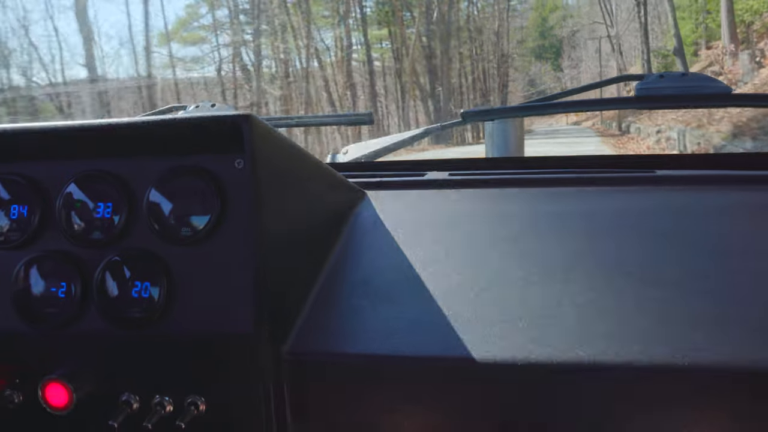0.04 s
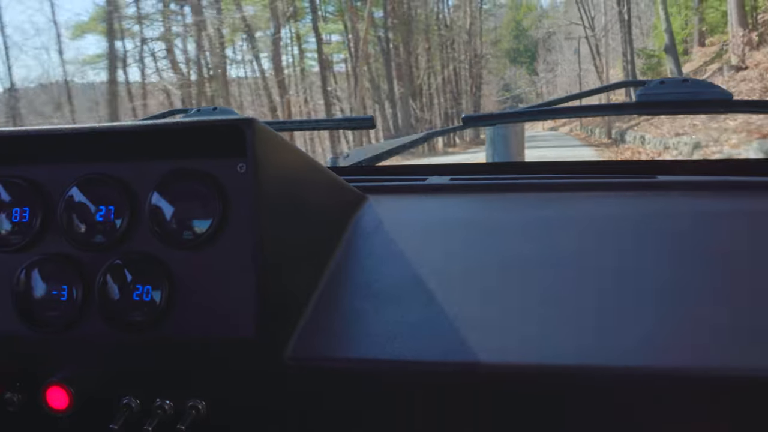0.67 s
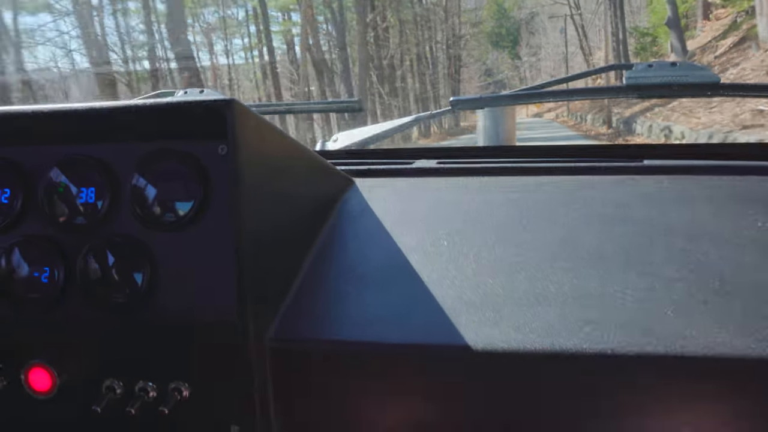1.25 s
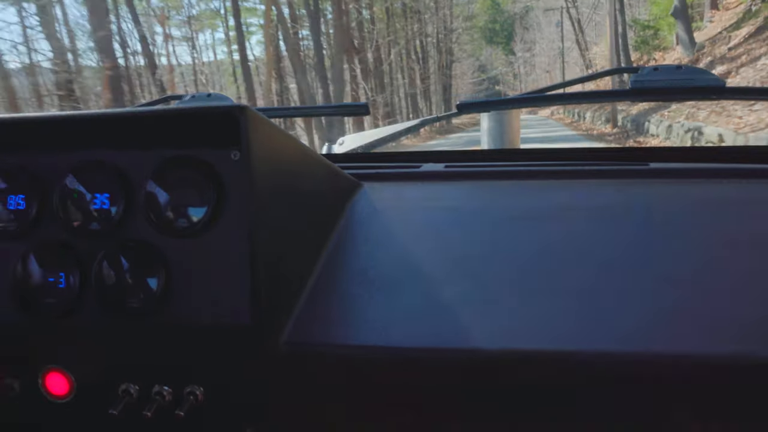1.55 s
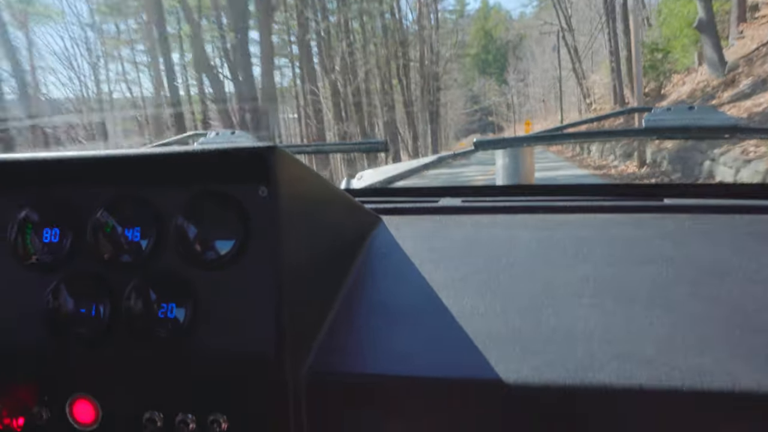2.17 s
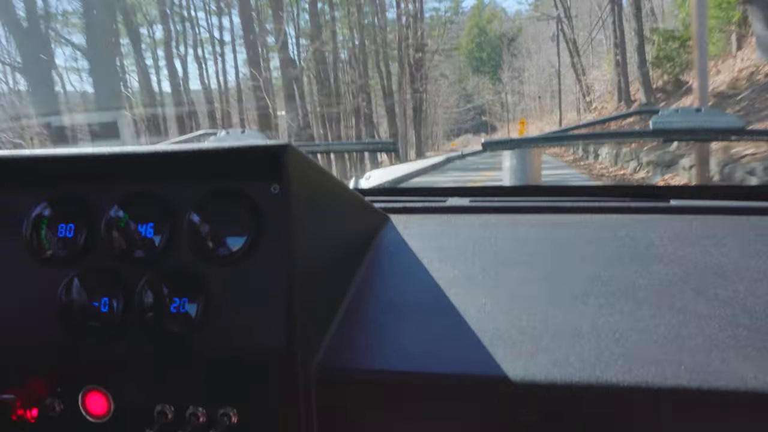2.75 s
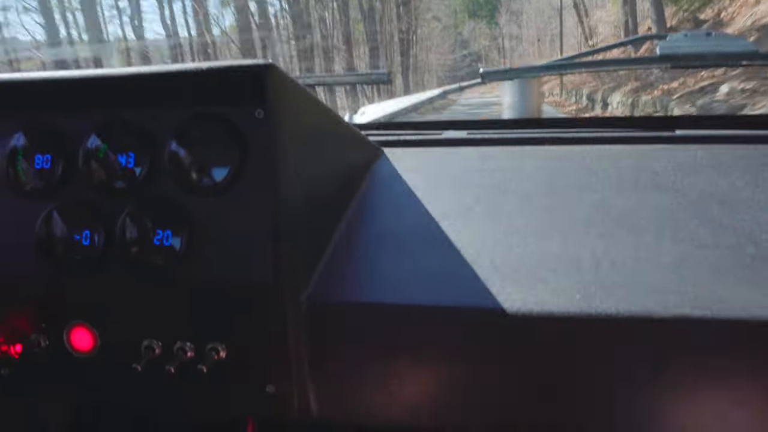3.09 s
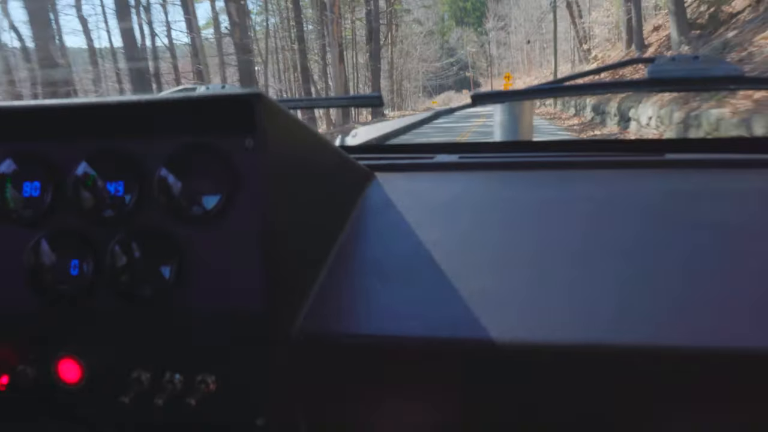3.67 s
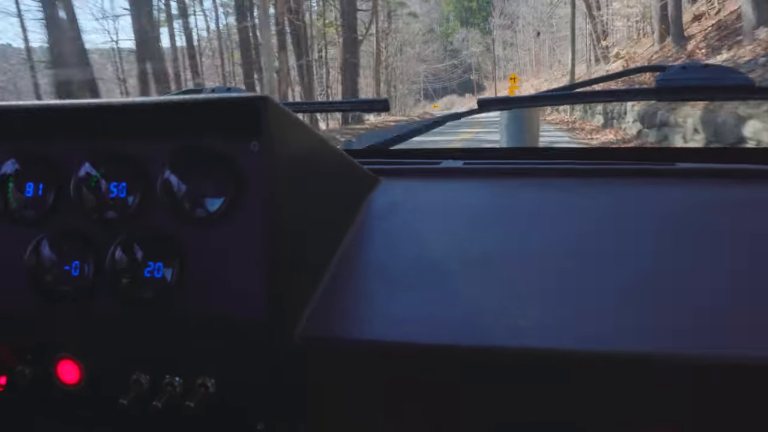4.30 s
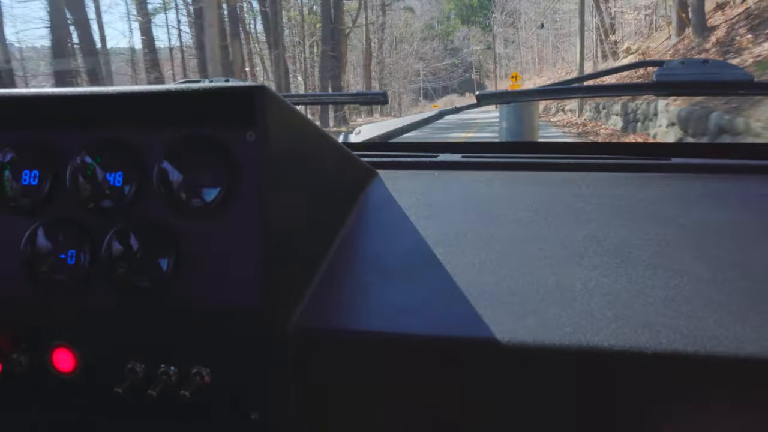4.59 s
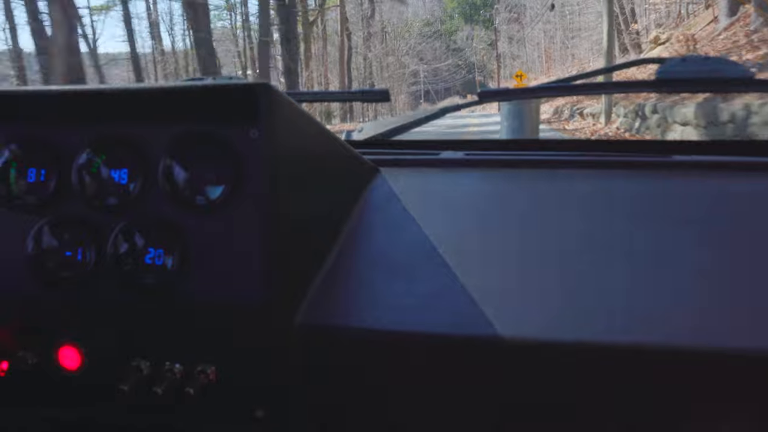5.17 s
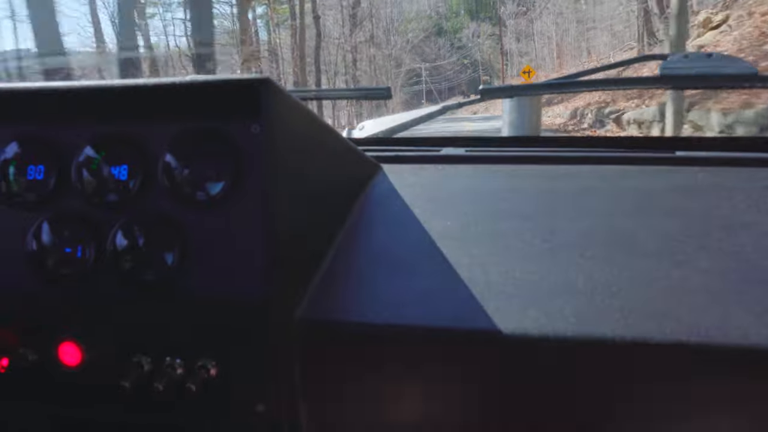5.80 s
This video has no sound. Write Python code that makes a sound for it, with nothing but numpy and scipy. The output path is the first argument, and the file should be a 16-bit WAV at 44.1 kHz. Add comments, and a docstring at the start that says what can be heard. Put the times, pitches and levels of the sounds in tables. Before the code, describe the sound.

Heard from inside a moving car, a booming diesel engine speeds up while its turbo whistle rises, turns breathy, then drops.

```python
"""Turbo diesel from the cabin

One microphone at the dashboard of a small four-cylinder car pulling along a country road.
Close up, the firings boom in the cabin and rattle the block. The turbo whistle throbs with the
exhaust pulses, climbs and turns breathy under boost, then falls back. Behind it the intake hisses
and the pipes sing; underneath, tyre roar grows with speed."""
import sys
import numpy as np
from scipy import signal
from scipy.fft import rfft, irfft, next_fast_len
from scipy.io import wavfile

SR = 44100
rng = np.random.default_rng(int(sys.argv[2]) if len(sys.argv) > 2 else 0)


def store_wav(level_fs):
    """Save 16-bit WAV to argv[1]."""
    pcm = np.round(np.clip(np.atleast_2d(level_fs), -1, 1) * 32767)
    wavfile.write(sys.argv[1], SR, pcm.T.astype(np.int16))


N = 257443

# Engine speed. Each row: time in seconds, firings per second.
FIRING_RATE = [(0, 76.2), (0.3, 76.9), (0.9, 77.4), (1.6, 79.1), (2.35, 86.6), (3.2, 99.9), (3.6, 101.3),
               (3.9, 102.9), (4.8, 102.6), (5.84, 101.4)]
# How hard the engine pulls. Each row: time in seconds, load from 0 to 1.
ENGINE_LOAD = [(0, 0.1), (1.35, 0.03), (1.75, 0.58), (2.35, 0.51), (2.8, 0.85), (3.3, 0.46), (3.6, 0.2),
               (3.9, 0.11), (5.84, 0.15)]
# Boom in the cabin. Each row: time in seconds, firing tone in dB, its octave in dB.
BOOM_LEVELS = [(0, -20, -27), (0.8, -21, -30), (1.35, -22, -35), (1.47, -29, -32), (1.58, -17.5, -22.5),
               (1.69, -23, -22), (1.77, -17.5, -22), (2.12, -20.5, -25), (2.33, -17, -21),
               (2.6, -16.5, -23.5), (2.78, -27.5, -24.5), (3.03, -25.5, -22), (3.22, -38, -22.5),
               (3.35, -27.5, -22), (3.67, -21.3, -26.5), (4, -25, -25.5), (5.84, -21, -26)]
# The boom dips briefly as the engine lugs. Each row: centre in seconds, depth in dB.
BOOM_DIPS = [(0.97, 7), (1.17, 6), (1.28, 1.5)]
# Weaker engine orders. Each row: multiple of the firing rate, base dB at no load and at full load.
ENGINE_ORDERS = [(0.5, -56, -55), (1.5, -55.5, -39), (2.5, -60.5, -42.5), (3, -49.5, -42),
                 (3.5, -53.5, -57), (4, -47.5, -49), (4.5, -47.5, -66.5), (5, -56, -56), (6, -51, -52),
                 (5.5, -72, -52.5), (7, -53.5, -56), (8, -53.5, -59), (11, -51.5, -68), (12, -55, -64),
                 (14, -55, -65), (21, -67, -59)]
# Cabin resonances that lift a passing order. Each row: centre in Hz, width in Hz, lift in dB.
CABIN_MODES = [(150.7, 12, 14.5), (241.4, 20.4, 14.5), (279, 10.4, 9.5), (308.5, 16, 4.5), (377, 7.5, 13),
               (467.3, 16, 12), (509.4, 28, 7.5), (585, 34, 9)]
# Strength of the knock. Each entry: one cylinder's relative level in dB.
CYLINDER_KNOCK_DB = [4, -2, -1.5, 5]
# Colour of the clatter. Each row: frequency in Hz, relative level in dB.
CLATTER_SPECTRUM = [(200, 15.5), (500, -5), (800, -2), (1250, -4), (1500, -5), (2000, -6.5), (2600, -13),
                    (3300, -15.5), (4300, -27), (6000, -16), (9000, -51), (15000, -55)]
# Ringing of block, covers and bulkhead. Each row: centre in Hz, width in Hz, lift in dB.
BLOCK_MODES = [(494, 27, 16), (848, 36, 13.5), (941.7, 14, 7), (1055, 86, 10.5), (1154, 114, 5),
               (1262, 38, 8.5), (1352, 97, 3.5), (1760, 80, 5.5), (1700, 40, -0.5), (2138, 41, 8.5),
               (2424, 73, 8.5), (2640, 86, 11.5), (2930, 12, 14)]
# Turbo speed. Each row: time in seconds, blade tone in Hz.
BLADE_TONE = [(0, 4730), (0.26, 4820), (1.4, 4915), (1.7, 5410), (1.9, 5890), (2.4, 6970), (2.7, 8580),
              (3.0, 10130), (3.25, 10700), (3.5, 10130), (3.85, 8600), (4.35, 7500), (4.8, 7490),
              (5.3, 7300), (5.84, 7300)]
# How each pitch of the whistle carries to the cabin. Each row: pitch in Hz, level at no load in dB.
WHISTLE_TO_CABIN = [(4720, -48), (4795, -42.5), (4870, -44.5), (5100, -41), (6050, -44.5), (6550, -52),
                    (7200, -61), (7500, -57), (7750, -66), (8500, -54.5), (9200, -60.5), (10000, -60),
                    (10700, -64)]
# Swells of the lower whistle. Each row: centre in seconds, half length in seconds, level in dB.
WHISTLE_SWELLS = [(4.88, 0.09, -48.5), (5.177, 0.11, -47), (5.584, 0.24, -47)]
# Intake and exhaust pipe resonances. Each row: centre in Hz, width in Hz, level in dB at full load
# and best excitation, blade tone in Hz that excites it most.
PIPE_MODES = [(522, 40, -39.5, 5150), (843, 35, -43, 6100), (1134, 140, -47, 5500), (2390, 20, -48, 7300),
              (3330, 74, -49, 6600), (4970, 130, -46, 6400), (6600, 67, -51, 7800), (1302, 50, -38, 8800),
              (2507, 120, -41, 9040), (5600, 160, -43.5, 8800), (1044, 85, -49, 10200),
              (2926, 74, -41, 10400), (3980, 290, -36.5, 10850), (7070, 420, -47.5, 10000)]
# Colour of the intake hiss. Each row: frequency in Hz, relative level in dB.
HISS_SPECTRUM = [(1500, -10), (3000, 1.5), (4200, 1.5), (5000, 2.5), (5900, 0), (6600, -5), (7200, -4.5),
                 (8000, -10), (9600, -15), (12000, -17), (14000, -22), (15600, -29)]
# Colour of the rush under boost. Each row: frequency in Hz, relative level in dB.
RUSH_SPECTRUM = [(2500, 12.5), (4500, 4), (6200, -3), (8500, -0.5), (9700, -15), (12000, -11), (14000, -17),
                 (15600, -30)]
# Tyre roar at the microphone. Each row: time in seconds, level in dB.
TYRE_LEVEL = [(0, -35), (0.6, -37), (1.5, -36.5), (3.0, -35.5), (4.2, -33.5), (4.65, -29.5), (5.84, -29.5)]
# Colour of the tyre roar. Each row: frequency in Hz, relative level in dB.
TYRE_SPECTRUM = [(100, 11), (250, 8), (380, 2), (600, 4), (800, -3), (1000, -12), (1500, -9), (3000, -16.5),
                 (8000, -74)]
# Cabin air resonances that shape the roar. Each row: centre in Hz, width in Hz, lift in dB.
CABIN_AIR_MODES = [(224, 16, -1.5), (365, 54, 7), (607, 41, 1), (771, 50, 8)]
# Colour of the body's rumble. Each row: frequency in Hz, relative level in dB.
RUMBLE_SPECTRUM = [(14, -36), (24, 2), (37, -0.5), (52, -8), (75, -2.5), (130, -13), (220, -11.5),
                   (400, -59), (800, -41)]

BASE_FIRING_HZ, BASE_TURBO_HZ = 77, 4800   # revs and spool count doublings of speed above these


def boom(firings, revs, dip_half_s=0.03):
    """The firing tone and its octave fill the cabin around the microphone with peaked pressure pulses."""
    first_db, octave_db = in_time(BOOM_LEVELS)
    t, angle = np.arange(N) / SR, 2 * np.pi * firings
    dips_db = sum(db * np.exp(-((t - s) / dip_half_s) ** 2) for s, db in BOOM_DIPS)
    flutter = from_db(0.5 * drift(20) - dips_db)   # no two firings are quite equally strong
    first = from_db(first_db) * np.cos(angle)
    lead_rad = 1.5 - 6.5 * revs   # the octave's lead turns as the engine speeds up
    octave = from_db(octave_db + 1.14 * drift(9.9)) * np.cos(2 * angle + lead_rad)
    return np.sqrt(2) * flutter * (first + octave)


def orders(firings, firing_hz, load, waver_db=3, db_per_doubling=8.5):
    """Tones locked to the crankshaft grow with speed, shift with load and swell in cabin resonances."""
    tones = 0
    for multiple, light_db, full_db in ENGINE_ORDERS:
        level_db = light_db + load * (full_db - light_db) + lift_db(multiple * firing_hz, CABIN_MODES)
        gain = from_db(level_db + waver_db * drift(5))
        phase = 2 * np.pi * (multiple * firings + rng.random()) + 0.11 * drift(6.4)
        tones += np.sqrt(2) * gain * np.sin(phase)
    return tones * from_db(db_per_doubling * np.log2(firing_hz / firing_hz.mean()))


def knock(firings, depth):
    """The surge of each firing, with a strength of its own for each cylinder."""
    strength = from_db(CYLINDER_KNOCK_DB)[firings.astype(int) % len(CYLINDER_KNOCK_DB)]
    return 1 + depth * strength * np.exp(-3.5 * (firings % 1))


def clatter(firings, revs, load, repeat_share=0.35, points=2048):
    """Injectors, valves and combustion rattle the block; part of it repeats every four firings."""
    cycle_position = firings / len(CYLINDER_KNOCK_DB) % 1
    pattern = np.interp(cycle_position * points, np.arange(points), rng.standard_normal(points))
    rattle = np.sqrt(repeat_share) * rms_one(pattern)
    rattle += np.sqrt(1 - repeat_share) * rng.standard_normal(N)
    level_db = -39.5 + 6 * load + 10 * revs
    return from_db(level_db) * coloured(rattle * knock(firings, depth=0.27), CLATTER_SPECTRUM, BLOCK_MODES)


def turbo_whistle(firings, turbo_hz, spool, load):
    """The main whistle gets breathier and patchier with load and speed, and fainter at high pitch."""
    breathy = 0.05 + 0.7 * load + 0.495 * spool
    patches_db = 1.5 * breathy * drift(5)
    level_db = np.interp(turbo_hz, *np.transpose(WHISTLE_TO_CABIN)) + 4 * load + patches_db
    return from_db(level_db) * whistle(turbo_hz, firings, breathy, throb=0.48, swing_rad=0.7,
                                       width_hz=400, wander_hz=40, flutter_db=1)


def lower_whistle(firings, first_swell_hz=7250, sag_hz_per_s=310):
    """While cruising, a purer whistle swells and fades just below the main one, its pitch sagging."""
    t = np.arange(N) / SR
    hz = first_swell_hz - sag_hz_per_s * (t - WHISTLE_SWELLS[0][0])
    swells = sum(from_db(db) * np.exp(-((t - centre) / half) ** 2) for centre, half, db in WHISTLE_SWELLS)
    return swells * whistle(hz, firings, breathy=0.2, throb=0.3, swing_rad=0.45,
                            width_hz=160, wander_hz=25, flutter_db=1.2)


def whistle(hz, firings, breathy, throb, swing_rad, width_hz, wander_hz, flutter_db):
    """A blade tone throbs and swings with each exhaust pulse; turbulence blurs it into narrow noise."""
    breathy = np.clip(breathy, 0, 1)
    angle = 2 * np.pi * firings
    phase = 2 * np.pi * turns(hz + wander_hz * breathy * drift(14)) + swing_rad * np.cos(angle)
    lowpass = signal.butter(2, width_hz / 2, fs=SR, output="sos")
    eddies = signal.sosfilt(lowpass, rng.standard_normal((2, N)))
    breath = rms_one(eddies[0] * np.cos(phase) + eddies[1] * np.sin(phase))
    tone = np.sqrt(2) * np.sin(phase)
    pulse = rms_one((1 + throb * np.sin(angle)) * from_db(flutter_db * drift(9.5)))
    return pulse * (np.sqrt(1 - breathy) * tone + np.sqrt(breathy) * breath)


def pipes(firings, turbo_hz, load, reach_hz=940):
    """Under load, pulsing gas sets each pipe resonance singing over a range of turbo speeds."""
    songs = 0
    for hz, width_hz, level_db, best_hz in PIPE_MODES:
        band = signal.butter(1, [hz - width_hz / 2, hz + width_hz / 2], "band", fs=SR, output="sos")
        gas = rng.standard_normal(N) * knock(firings, depth=1.3)
        song = rms_one(signal.sosfilt(np.vstack([band, band]), gas))
        songs += from_db(level_db) * song / (1 + ((turbo_hz - best_hz) / reach_hz) ** 2)
    return load * songs


def intake(firings, revs, spool):
    """The intake draws its air in hissing gulps, one per cylinder; boost adds a rush."""
    gulps = rng.standard_normal(N) * knock(firings, depth=0.098)
    hiss = from_db(-48 + 5 * spool + 3.5 * revs) * coloured(gulps, HISS_SPECTRUM)
    rush = from_db(-72 + 24.5 * spool) * coloured(rng.standard_normal(N), RUSH_SPECTRUM)
    return reflections(hiss + rush)


def reflections(x, echo_db=-9, count=80):
    """Windscreen, doors and dashboard, all near the microphone, return a dense spray of short echoes."""
    lags = (rng.uniform(0.002, 0.045, count) * SR).astype(int)
    echoes = sum((-1) ** k * np.pad(x, (lag, 0))[:N] for k, lag in enumerate(lags)) / np.sqrt(count)
    return (x + from_db(echo_db) * echoes) / np.sqrt(1 + from_db(echo_db) ** 2)


def road():
    """Under the floor, tyres roar over small bumps, above the steady rumble of the body."""
    roar_db, = in_time(TYRE_LEVEL)
    bumps = from_db(0.9 * drift(25))
    roar = from_db(roar_db) * coloured(rng.standard_normal(N) * bumps, TYRE_SPECTRUM, CABIN_AIR_MODES)
    rumble = from_db(-30.5) * coloured(rng.standard_normal(N), RUMBLE_SPECTRUM)
    return roar + rumble


def from_db(db):
    """Decibels to gain."""
    return 10 ** (np.asarray(db) / 20)


def rms_one(x):
    """Scale to an rms of 1."""
    return x / np.sqrt(np.mean(x ** 2) + 1e-20)


def in_time(rows):
    """The columns of a curve table at every sample."""
    seconds, *columns = np.transpose(rows)
    return [np.interp(np.arange(N) / SR, seconds, column) for column in columns]


def turns(hz):
    """Cycles completed at a changing frequency."""
    return np.cumsum(hz) / SR


def lift_db(hz, modes):
    """The lift that a set of resonances gives at these frequencies."""
    return sum(db / (1 + (2 * (hz - centre) / width) ** 2) for centre, width, db in modes)


def coloured(x, spectrum, modes=()):
    """Shape a signal by a smooth spectrum and resonances; rms 1."""
    size = next_fast_len(N)
    hz = np.maximum(np.arange(size // 2 + 1) * SR / size, 1)
    points_hz, levels_db = np.transpose(spectrum)
    gain = from_db(np.interp(np.log(hz), np.log(points_hz), levels_db) + lift_db(hz, modes))
    roll_off = 1 / (1 + (points_hz[0] / hz) ** 4) / (1 + (hz / points_hz[-1] / 2) ** 4)
    return rms_one(irfft(rfft(x, size) * gain * roll_off, size)[:N])


def drift(rate_hz, step=20, settle=4000):
    """A smooth random wander, mostly slower than this rate; rms 1."""
    pole = np.exp(-2 * np.pi * rate_hz * step / SR)
    noise = rng.standard_normal(N // step + settle + 2)
    slow = signal.lfilter([1], [1, -2 * pole, pole * pole], noise)[settle:]
    return np.interp(np.arange(N) / step, np.arange(len(slow)), rms_one(slow))


def scene():
    """Engine, turbo and road, in mono at the dashboard."""
    firing_hz, = in_time(FIRING_RATE)
    load, = in_time(ENGINE_LOAD)
    turbo_hz, = in_time(BLADE_TONE)
    firings = turns(firing_hz)
    revs = np.log2(firing_hz / BASE_FIRING_HZ)
    spool = np.log2(turbo_hz / BASE_TURBO_HZ)
    engine = boom(firings, revs) + orders(firings, firing_hz, load) + clatter(firings, revs, load)
    turbo = turbo_whistle(firings, turbo_hz, spool, load) + lower_whistle(firings)
    air = intake(firings, revs, spool) + pipes(firings, turbo_hz, load)
    return (engine + turbo + air + road())[None]


def record(dry, cutoff_hz=15700):
    """The top of the treble is cut steeply."""
    return signal.sosfilt(signal.ellip(10, 0.1, 80, cutoff_hz, fs=SR, output="sos"), dry)


dry = scene()
out = record(dry)
store_wav(out)
```